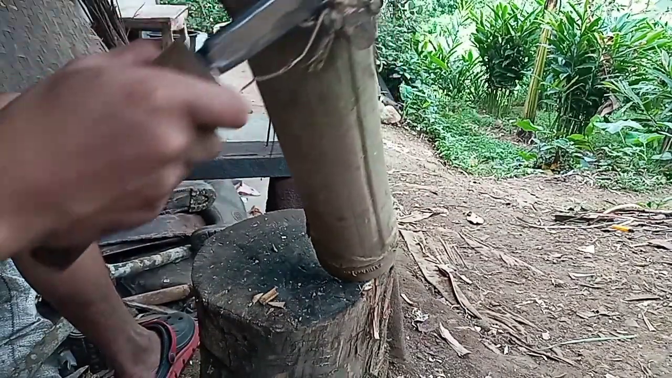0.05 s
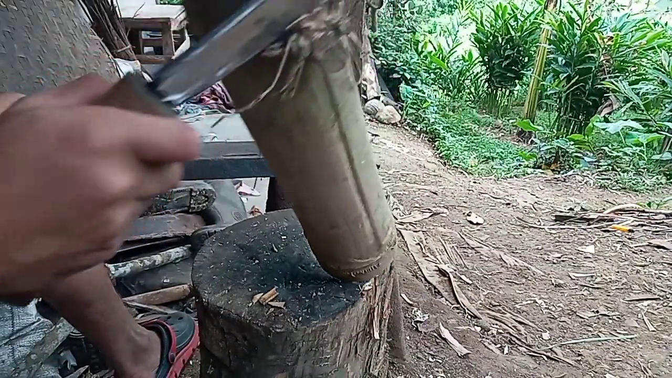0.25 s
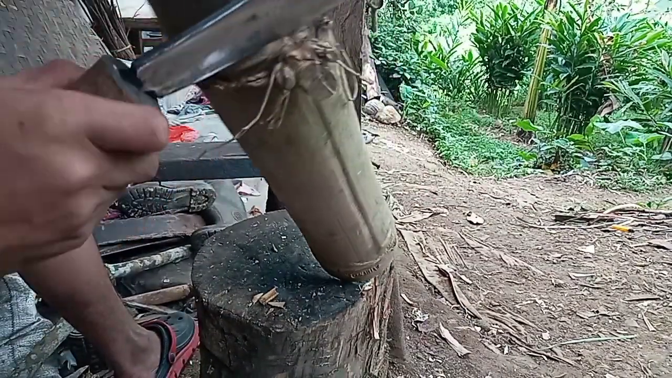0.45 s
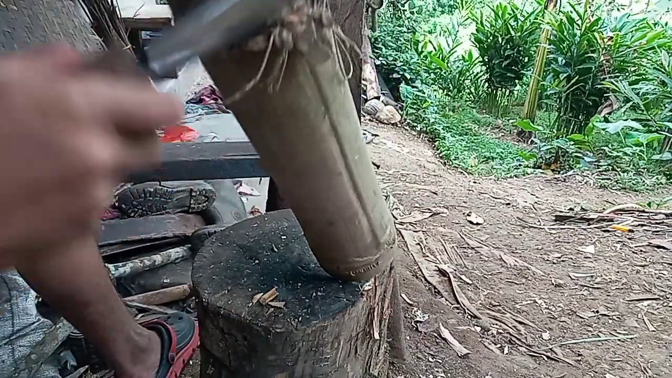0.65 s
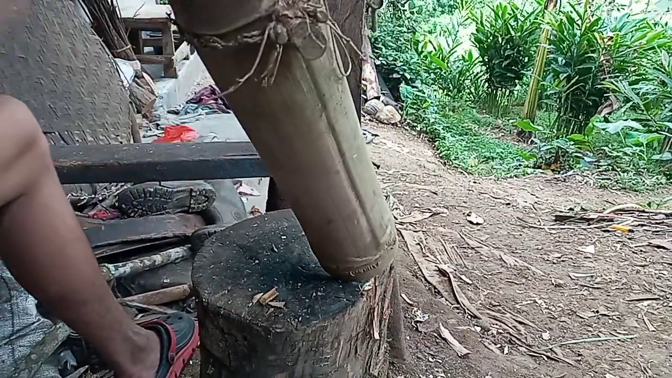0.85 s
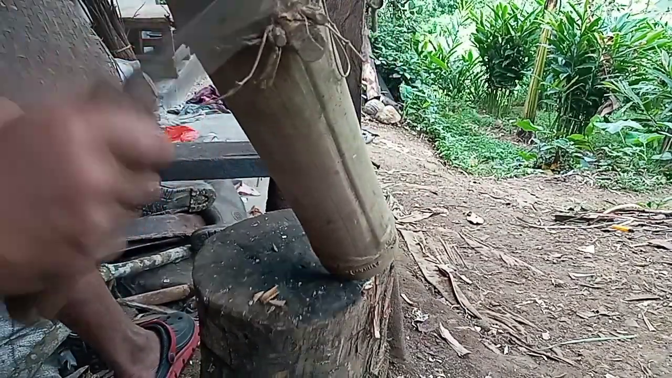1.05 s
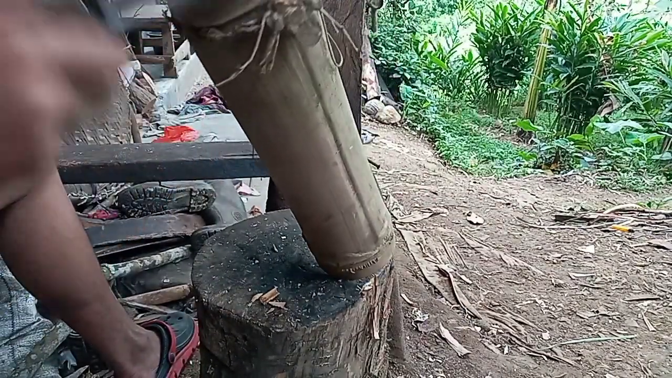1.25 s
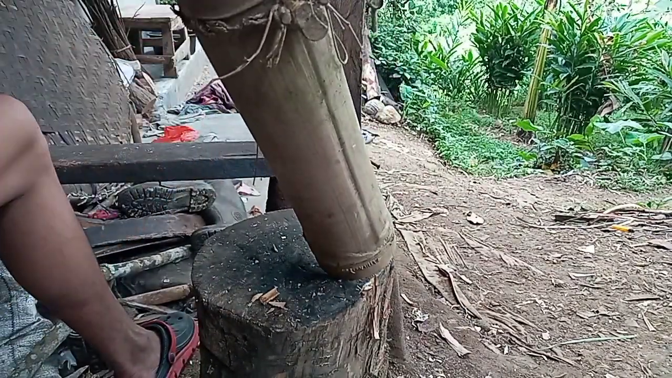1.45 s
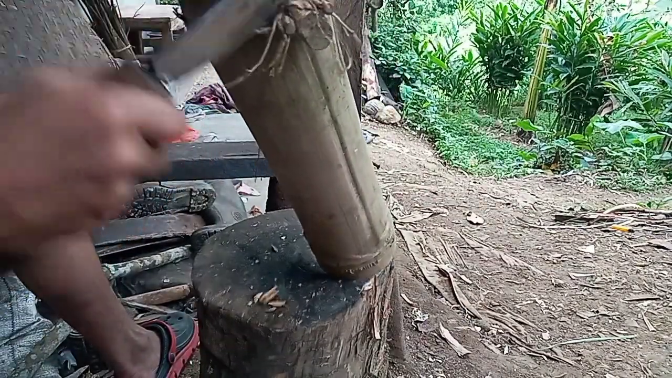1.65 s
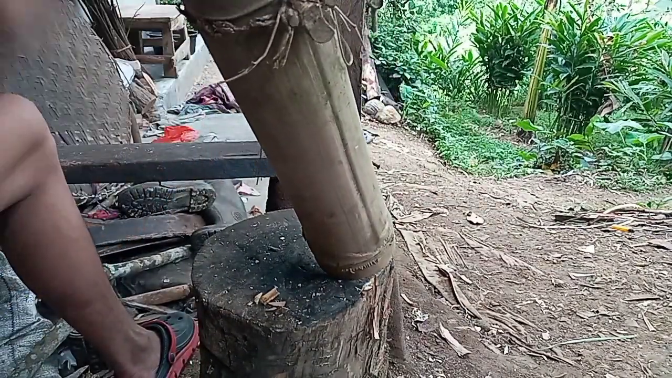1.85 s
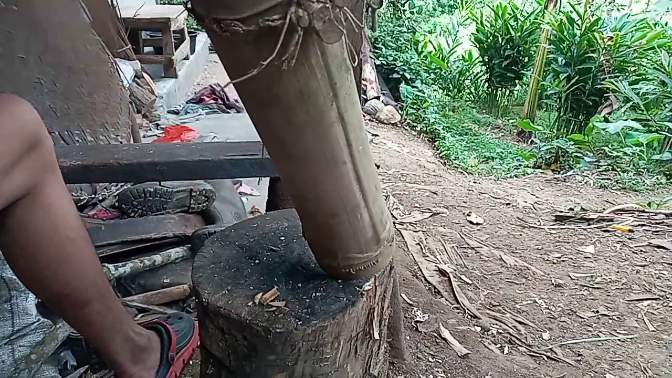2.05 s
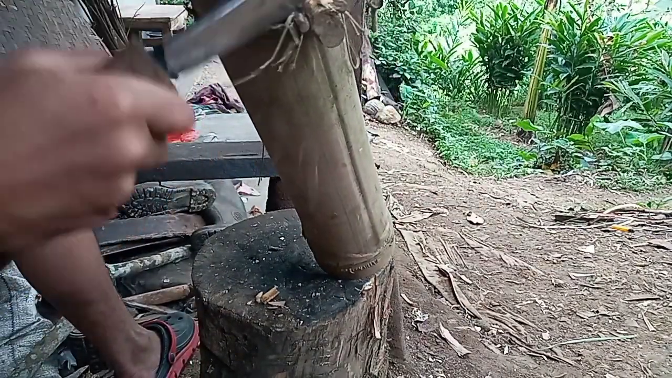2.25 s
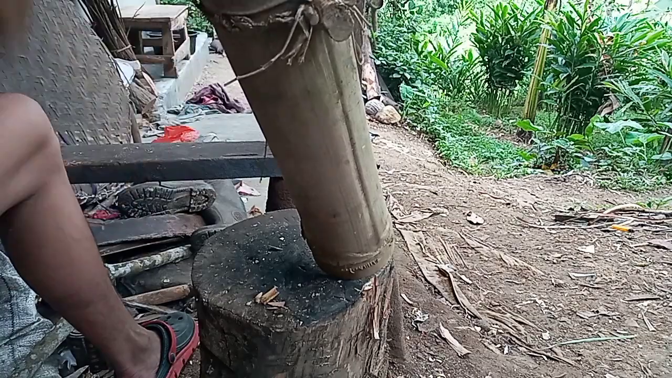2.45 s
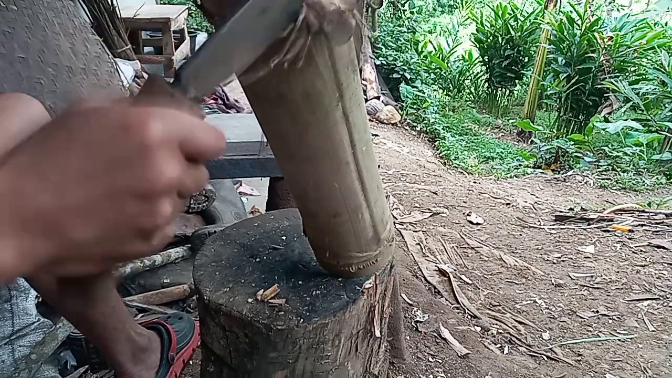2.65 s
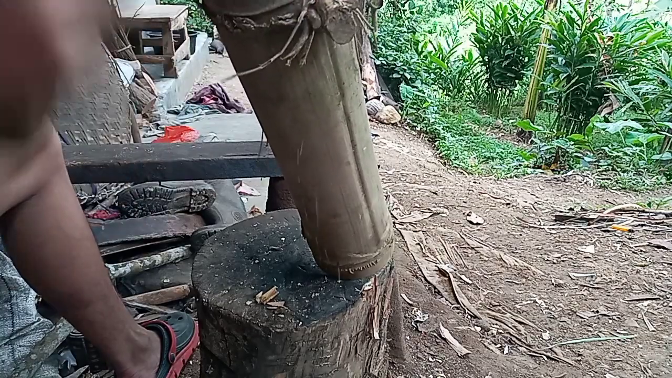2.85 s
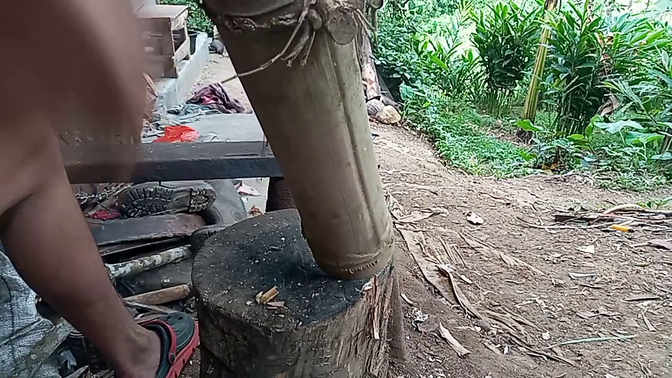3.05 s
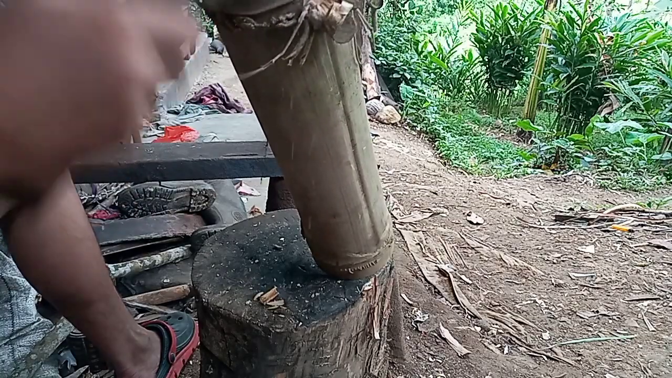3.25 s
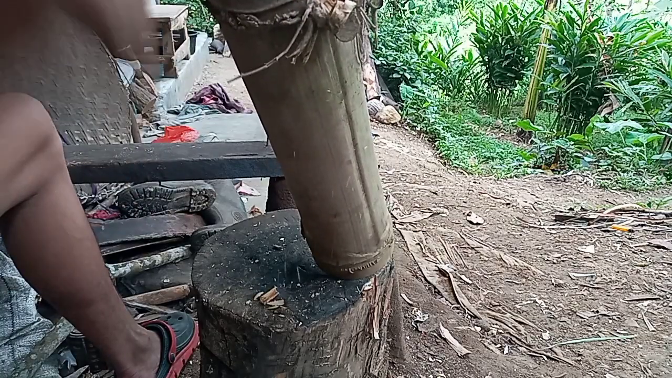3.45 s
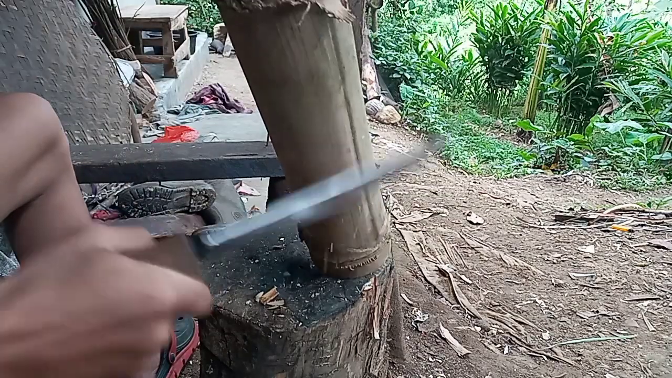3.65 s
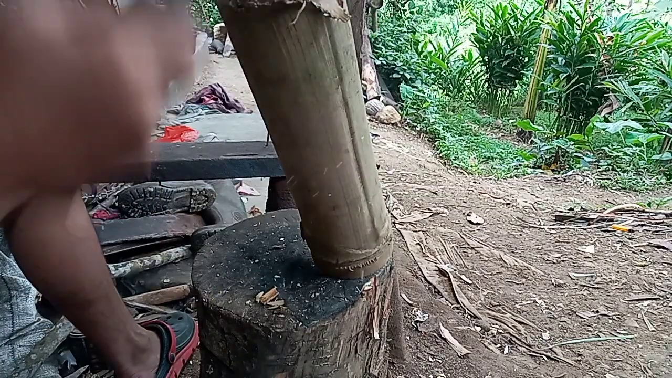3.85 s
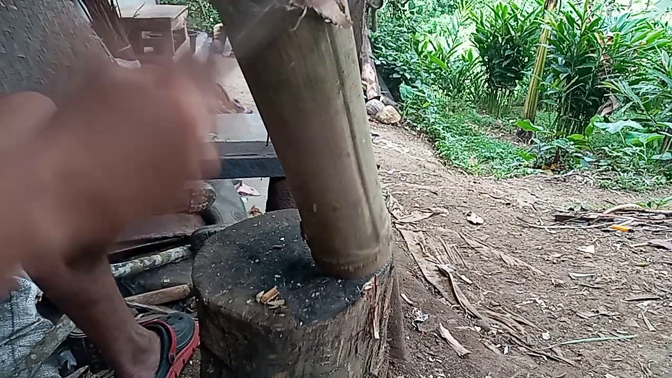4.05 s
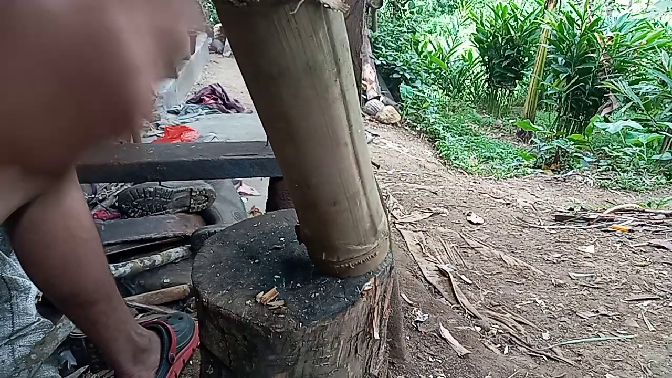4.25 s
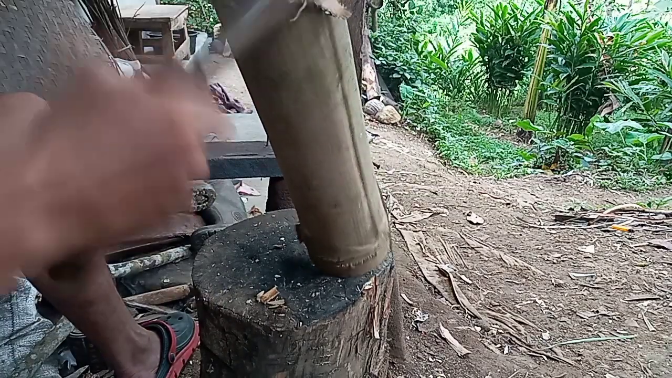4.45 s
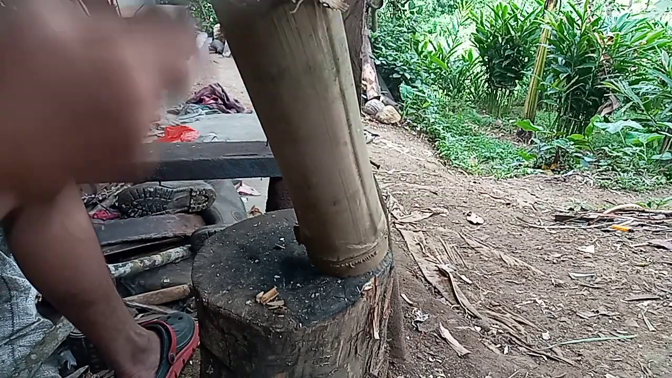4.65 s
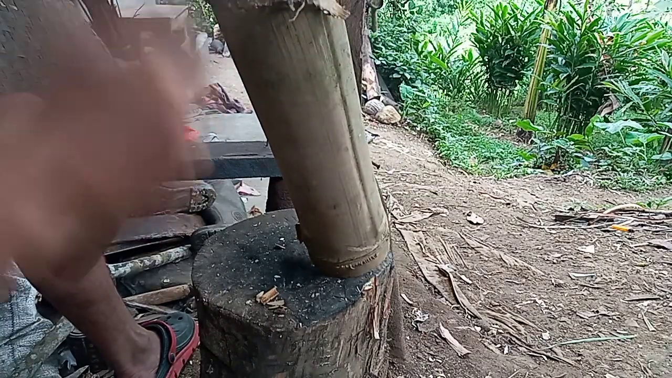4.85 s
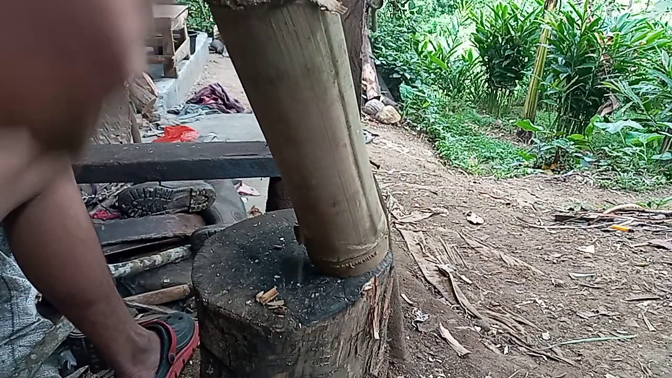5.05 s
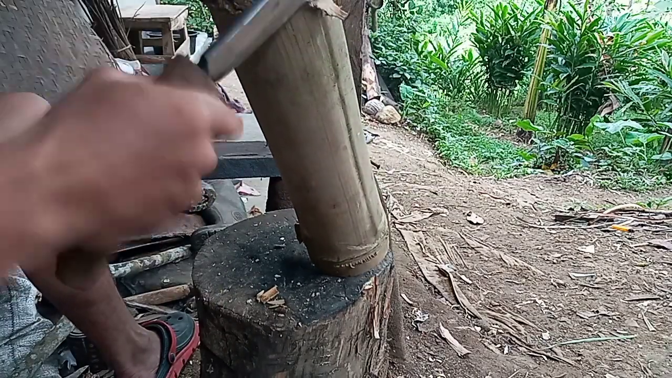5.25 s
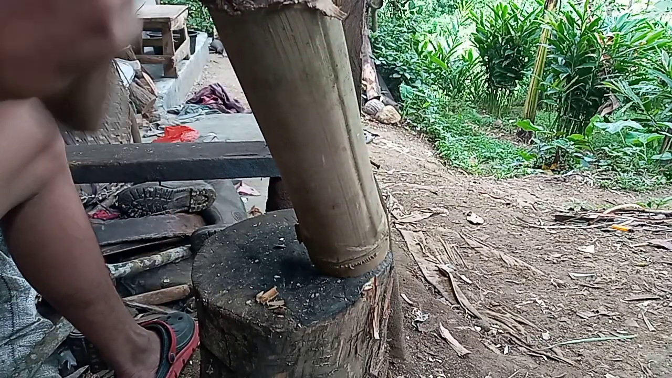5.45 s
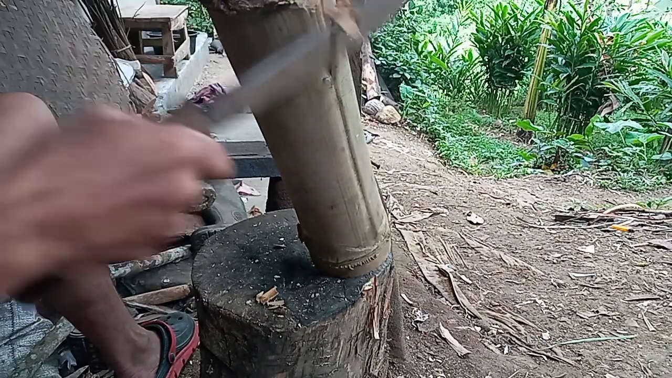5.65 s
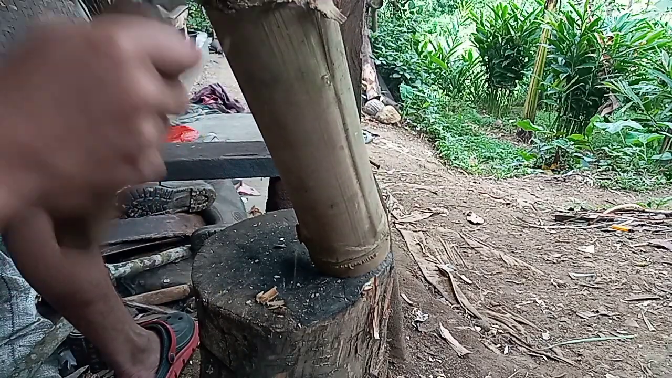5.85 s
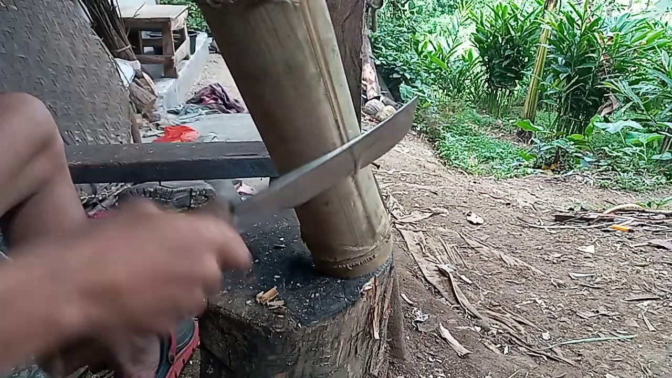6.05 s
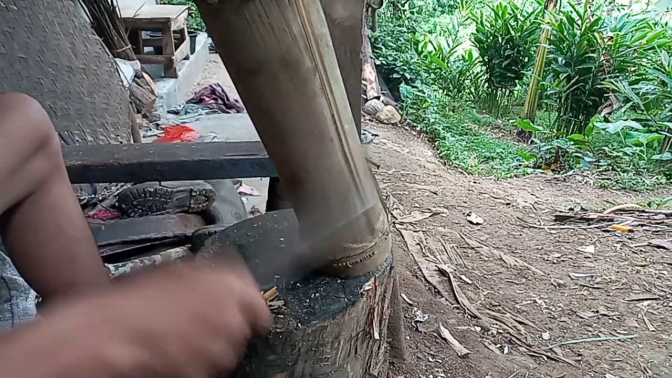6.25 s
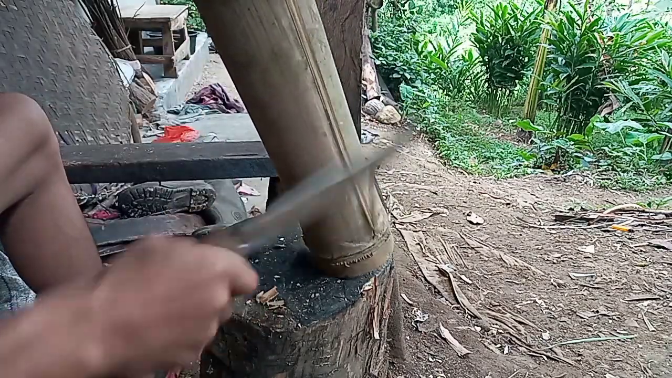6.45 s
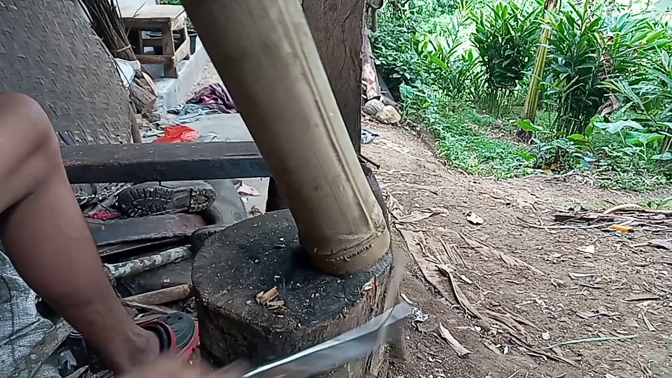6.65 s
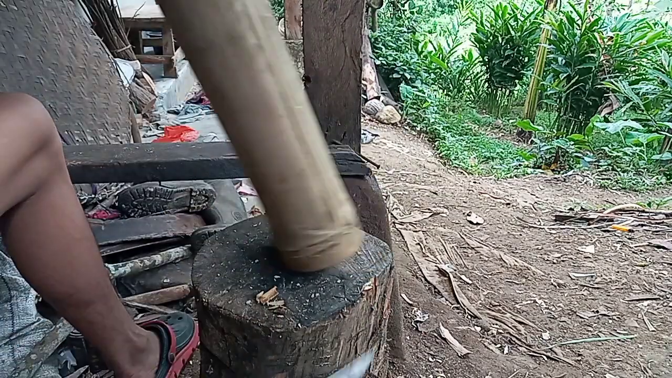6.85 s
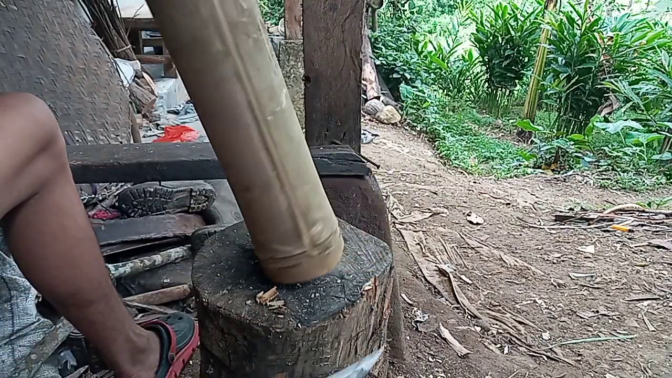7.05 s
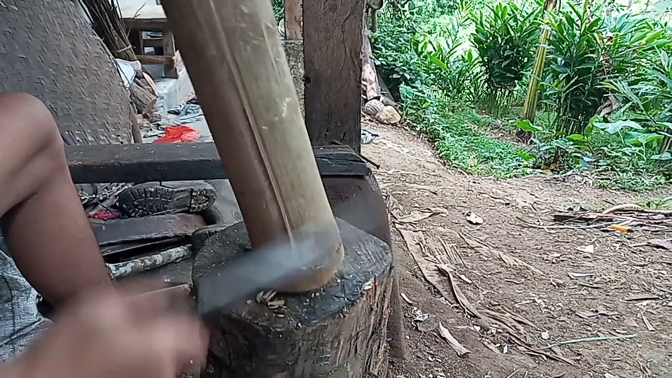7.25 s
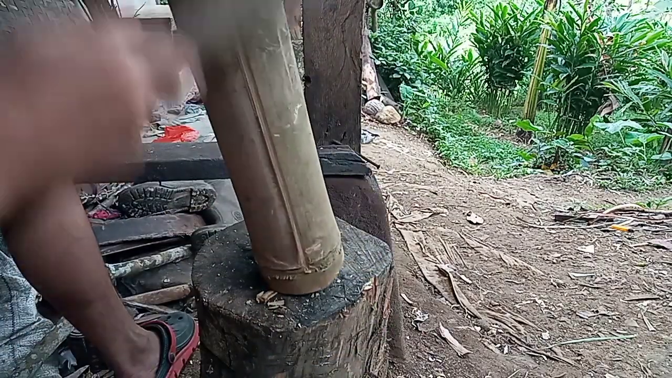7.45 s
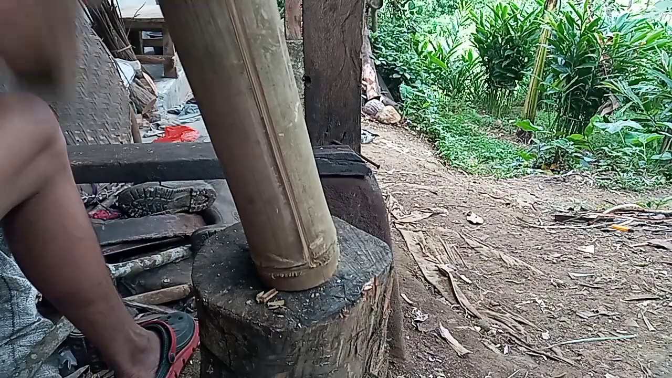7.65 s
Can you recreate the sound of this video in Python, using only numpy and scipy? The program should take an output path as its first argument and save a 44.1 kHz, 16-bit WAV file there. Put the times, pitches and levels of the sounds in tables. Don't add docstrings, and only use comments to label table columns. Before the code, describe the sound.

Faint handling and dry knocks come first, with a low puttering motorbike leaving nearby. Then steady, very loud chops of a blade into hollow bamboo, bright and crackling, slightly quickening, with dry fibre ticks between them and weak echoes from sheds and trees. After the last chop, lighter scraping, snapping and hollow taps fade away, leaving thin insect hiss. The work is very close, nearer the right side of a handheld microphone.

```python
import sys
import numpy as np
from scipy import signal
from scipy.fft import rfft, irfft, next_fast_len
from scipy.io import wavfile
from scipy.ndimage import uniform_filter1d

SR = 44100
rng = np.random.default_rng(int(sys.argv[2]) if len(sys.argv) > 2 else 0)


def unload_audio(sound):
    columns = np.transpose(np.atleast_2d(sound))
    steps = np.round(np.clip(columns, -1, 1) * 32767)
    wavfile.write(sys.argv[1], SR, steps.astype(np.int16))


def decibels_to_gain(level_db):
    exponent = np.asarray(level_db, float) / 20
    return 10 ** exponent


N = 340011

# t/s, blade level/dB, tube, wall and splinters rel. level/dB
BLOWS = [(1.074, -9, -5, -3.5, -0.5), (1.619, -5.5, -7.5, -2, -6.5), (2.138, 0, -11, -5.5, -7),
         (2.644, -3.5, -5.5, -11.5, -8.5), (3.085, -22.5, 10.5, 4.5, -3), (3.103, -5, -6.5, -7, -13.5),
         (3.529, -4, -11.5, -11, -8.5), (4.087, -2.5, -17.5, -11, -9), (4.484, -7.5, -26.5, -7, -8),
         (4.875, 2, -15.5, -11, -15), (5.24, -0.5, -44, -6, -10), (5.589, -0.5, -32, -11, -12.5)]
# t/s, blade level/dB, tube, wall and splinters rel. level/dB
TAPS = [(.211, -63.5, 24.5, 33, 5), (.415, -16.5, -36, -24, -17), (.602, -18.5, -56.5, -23, -49),
        (1.122, -10, -41, -22.5, -24), (3.177, -26, -12, -16, 7.5), (3.813, -5.5, -22.5, -22.5, -18),
        (3.855, -13, -16.5, -16, -8.5), (3.945, -28.5, -52.5, -5, -11.5), (6.361, -11.5, -19, -11.5, -6),
        (6.61, -14.5, -17.5, -14.5, -6), (6.767, -27, -39, -22.5, -1), (6.861, -18.5, -25.5, -14.5, -19)]
# t/s, blade level/dB, tube, wall and splinters rel. level/dB
GLANCES = [
    (5.291, -30, -11, -40, -5.5),
    (5.915, -17.5, -21.5, -3, -9),
    (5.952, -22, -7, -7, -21.5),
    (6.2666, -32, 1, 1.5, -7.5),
    (6.303, -22.5, -49, -40.5, 3.5),
    (6.528, -10, -15, -19.5, -28),
    (6.581, -20.5, -18, -19, 1.5),
    (6.726, -31.5, 1, -11.5, -10.5),
]
# t/s, blade level/dB, splinters rel. level/dB
TICKS = [(1.185, -17.5, -12), (1.38, -25.5, -7), (2.496, -23, 2.5), (2.556, -20.5, -9.5),
         (2.913, -22.5, -23), (2.932, -22, -20), (2.967, -31.5, -7.5), (3.052, -25.5, -1.5),
         (3.389, -18, -14.5), (3.396, -17, -15.5), (3.432, -17.5, -23), (3.437, -26.5, -7.5),
         (4.023, -19.5, -5.5), (5.189, -19.5, -6.5), (5.554, -11, -26.5), (5.687, -16.5, -5),
         (5.703, -24, -1.5), (5.705, -15, -9.5), (5.965, -13.5, -5.5), (5.977, -7, -2.5),
         (6.003, -11.5, -32.5), (6.141, -18, 0), (6.205, -18, -7), (6.677, -15, -15), (6.999, -19.5, -19.5),
         (7.04, -16.5, -52.5), (7.142, -26, 0), (7.342, -30, 4.5),
         (1.565, -31, 0.5), (1.79, -30, -9), (1.862, -35, 0.5), (2.526, -33, -9.5),
               (2.6, -31.5, -7.5), (2.618, -35.5, -1), (4.225, -30, -12.5), (4.405, -33, -15.5),
               (4.745, -28.5, -6.5), (4.789, -27, -8), (5.079, -23.5, -14.5), (5.108, -29, -7),
               (5.145, -29, -7), (5.17, -30.5, -6.5), (5.422, -19.5, -6.5), (6.796, -13, -19.5),
               (6.812, -31, -20), (6.915, -21, -6)]
TICK_TUBE_DB, TICK_WALL_DB = -49, -38
COLOUR_HZ = [800, 2200, 6000, 12000]
BITE_S = .0011
SPOT_LUCK_DB = 1.5
# low, lower middle, ringing, high, rel. level/dB
SPOTS = [(2.5, -3, 0.5, -4.5), (3.5, -5, 1.5, 2), (-10.5, 3, -2.5, -3.8), (-6, -0.5, -2.5, 4.5),
         (-6.5, 5.5, -3, 8), (-12.5, 1.5, -2, 2.5), (2, -1.9, 2.5, -5.5), (-2, 0.5, -1.9, -1),
         (4, -0.5, 0.7, -2), (0, -4, 0.5, -5.5), (3, 3.2, -1, 2), (2.5, -1, -1, -6)]
SPOT_HZ = [800, 1400, 1900, 2750, 4300, 5600, 6900, 9000]
BLADE_RING_DB = [-4.5, -2, -3.5, 1.6, 3, 1, 0.1, -2.5, 1.5, -7.5, -3, -4.3]
EDGES = 220 * 2 ** np.arange(0, 6.4, 1 / 3)
# f/Hz, level per third octave/dB
CRACK = [(250, -27), (450, -5.5), (800, -7.5), (1300, 1), (2000, 2), (3000, -2.5), (4200, 0), (5500, -7),
         (6900, -1.5), (8600, -11), (10500, 2), (13000, -8), (15200, -8.5)]
# f/Hz, T60/s
CRACK_T60 = [(100, 0.069), (600, 0.015), (2000, 0.031), (6000, 0.0083), (15000, 0.0036)]
# f/Hz, level/dB, T60/s
STALK_MODES = [(920, -27, 0.087), (1530, -12, 0.039), (1810, -21, 0.054), (2120, -17.5, 0.013),
               (2500, -11.5, 0.044), (2684, -6.5, .03), (4200, -27, 0.017), (6824, -8.5, 0.02)]

# loudest t/s, swell/s, fade/s, level/dB, share in the tube rel. level/dB
RUBS = [(.022, 0.042, 0.064, -45, -5), (.3, 0.118, 0.22, -41.5, -11), (.61, .07, 0.055, -49.5, -6),
        (.73, 0.033, 0.052, -44.5, -19), (2.56, .11, 0.069, -54.5, -33.5),
        (3.055, 0.013, 0.24, -50.5, -30.5), (3.396, 0.039, 0.24, -59, -28.5), (3.76, 0.17, 0.15, -52.5, -6),
        (3.82, 0.01, 0.13, -41, -28), (4.05, 0.089, 0.044, -53.5, -36), (5.96, 0.029, 0.022, -30, -4),
        (6.01, 0.025, 0.021, -29.5, -43), (6.175, 0.044, 0.063, -37, 4), (6.295, 0.052, 0.035, -30, 3.5),
        (6.805, 0.057, 0.031, -36.5, -42), (6.9, 0.095, 0.081, -33, -11.5),
        (7.035, 0.058, 0.079, -45.5, -33), (7.43, 0.049, 0.058, -53, -3)]
# f/Hz, level per Hz/dB
SCRAPE_COLOUR = [(240, -97), (400, -62), (1150, -37.5), (1450, -2.5), (1830, -4), (2210, -3.5), (4100, 2),
                 (6850, 1), (8600, -3), (10300, -3.5), (12900, -10), (15100, -13.5), (16300, -33)]
# f/Hz, level per Hz/dB
GRIP_COLOUR = [(410, -21.5), (700, -4), (1010, -90.5), (1540, 2.5), (2200, -20.5), (2480, -3.5),
               (4490, -5.5), (5400, -3), (10600, -16), (13800, -11.5), (15100, -26), (16300, -42.5)]
GRIP_ENDS_S = 1
SLIPS_PER_S, SLIP_T60_S, GLIDE_SHARE = 160, .02, .93
SWELL_DB, SWELL_CURVE = 25.5, 2.9

# t/s, lower note level/dB, upper note level/dB
TUBE_PUSHES = [(1.071, -20.5, -20.5), (1.616, -15, -17.5), (2.138, -35, -23), (2.644, -18.5, -9.5),
               (3.086, -14, -31.5), (3.101, -24, -9.5), (3.528, -29, -19.5), (4.083, -23.5, -25.5),
               (4.483, -37.5, -23.5), (4.875, -22, -13), (5.238, -20.5, -11), (5.589, -29.5, -18),
               (5.916, -32, -25), (6.262, -55, -33), (6.586, -49, -30)]
# f/Hz, T60/s
TUBE_NOTES = [(622, .18), (1125, .075)]
AFTER_RING_DB, AFTER_RING_LONGER = -19, 4
# f/Hz, level/dB
LINGERING = [(1820, -56.5), (2110, -55.5), (2760, -52.5)]
LINGER_MIX = [(3.5, 0.5, -14.5), (-2.5, -7.5, -3.5), (-6.5, -4, -2.5), (1, -2, -6), (-6, -5, -3.5),
              (-10.5, -13, -5.5), (0, -2, -11.5), (-1.5, -10, -5.5), (-7.5, -8.5, -2.5), (-0.5, -15.5, -1),
              (-2.5, 0.5, 4.5), (2, 5, 1.5)]
LINGER_T60_S = 0.6
# t/s, lower f/Hz, lower level/dB, upper f/Hz, upper level/dB
WALL_NOTES = [(1.075, 1877, -16.5, 2719, -15.5), (1.623, 1923, -19, 2526, -15),
              (2.141, 1774, -13.5, 2503, -10), (2.646, 1960, -16.5, 2620, -23.5),
              (3.086, 1860, -20, 2800, -24), (3.104, 1866, -16, 2896, -19), (3.529, 1950, -15.5, 2897, -24),
              (4.087, 2250, -19, 2850, -12.5), (4.485, 2313, -17, 2923, -22),
              (4.877, 1788, -11.5, 2835, -13), (5.24, 1861, -15.5, 2700, -12.5),
              (5.59, 2200, -17, 2950, -14), (5.9155, 1942, -11, 2885, -15.5),
              (5.954, 2162, -23, 2664, -20.5)]
WALL_T60_S, WALL_SOFT_S = 0.092, 0.0019
# t/s, peak level/dB, f/Hz, T60/s
KNOCKS = [(0.2099, -26, 1583, 0.098), (0.6015, -33.5, 1846, 0.032), (5.915, -16, 2087, 0.11),
          (5.9549, -21.5, 1086, 0.064), (6.1794, -35, 1290, 0.036), (3.777, -31, 2580, 0.03),
          (3.777, -31.5, 1520, .03), (6.2682, -16, 1852, 0.069), (6.27, -19, 1508, 0.1),
          (6.53, -15.5, 1477, 0.18), (6.5281, -20, 2120, 0.116), (6.5809, -23, 1130, 0.14),
          (6.7274, -20.5, 1540, 0.098), (6.8633, -24, 1180, 0.035), (7.45, -49, 1130, 0.11)]
# t/s, peak level/dB, f/Hz, T60/s
PINGS = [(.015, -44, 1122, .09), (.04, -45, 1140, 0.1), (.03, -35, 3030, .07), (.05, -51, 1840, .07),
         (.316, -36, 3000, 0.069), (.605, -44, 2720, .08), (.7, -41.5, 2717, .06), (.705, -47, 1834, 0.08),
         (5.9162, -9.5, 2700, 0.011), (5.948, -27, 1110, 0.084), (5.9552, -15, 2390, 0.014),
         (6.269, -11.5, 1730, .012), (6.5282, -14, 3900, 0.011), (6.729, -23, 3650, .015)]
# t/s, peak level/dB, f/Hz
SNAPS = [(0.414, -31.5, 7360), (1.1164, -20.5, 6900), (1.1228, -18, 6680), (1.1304, -25, 6970),
         (1.2037, -20, 6820), (1.2114, -30.5, 6990), (3.7155, -29, 3680), (3.7963, -24.5, 6920),
         (3.8127, -17.5, 6430), (3.8222, -7.5, 6480), (3.8304, -26.5, 7040), (3.8487, -18.5, 7480),
         (3.8694, -22.5, 7000), (3.8854, -27, 7040), (3.8944, -28.5, 7840), (3.9064, -31, 6900),
         (3.9194, -30, 6550), (6.0038, -12, 7150), (6.0084, -8, 6590), (6.0124, -14.5, 6640),
         (6.0184, -16, 6580), (6.2974, -18.5, 6740), (6.3041, -21, 8480), (6.3041, -9, 7170),
         (6.7755, -29.5, 6500), (6.795, -26, 6240), (6.9154, -20.5, 6800)]
SNAP_T60_S, SNAP_DB, SNAP_CLICK_DB = 0.01, -1, -3
# t/s, peak level/dB, f/Hz
THUDS = [(0.208, -27, 312), (0.211, -36, 432), (0.366, -32, 554), (0.608, -36, 100), (1.07, -21, 231.7),
         (1.618, -28, 111.2), (2.134, -28, 110.8), (2.641, -43.5, 227), (3.097, -17.5, 229),
         (3.522, -41, 213.5), (4.084, -25.5, 209.5), (4.482, -35.5, 102.3), (4.875, -18.5, 112.4),
         (5.239, -17.5, 236), (5.587, -38, 208.5), (6.269, -34.5, 231.5), (6.523, -28, 228.7),
         (6.581, -32, 239.7)]

# delay t/s, level/dB
ECHOES = [(.008, -32), (0.018, -47.5), (0.039, -53.5), (0.101, -57), (0.161, -65.5), (.2, -71.5),
          (0.3, -92), (0.502, -95.5)]
# f/Hz, level/dB
ECHO_COLOUR = [(100, 12.5), (700, -9), (1500, -5.5), (2600, -2), (5500, 4), (6900, -1), (9000, -2),
               (12500, -1)]
NEAR_DB, NEAR_T60_S = -31, .03
# loudest t/s, level/dB
BOOMS = [(1.759, -48.5), (2.301, -53.5), (2.679, -63), (3.24, -44), (4.2, -47), (4.62, -48.5), (5.04, -49),
         (5.38, -45), (5.71, -59), (6.3, -53)]
BOOM_SWELL_S, BOOM_FADE_S, BOOM_HZ = 0.074, 0.033, (175, 230.3)

# t/s, level/dB, open-throttle bark rel. level/dB
BIKE = [(0.0, -44.5, -5.5), (.17, -40.5, -4), (.41, -62.5, 18), (.62, -42.5, -7), (1.0, -42.5, -6),
        (1.44, -49, -12), (2.12, -53, 0), (2.64, -51.5, -7), (3.1, -65, 6), (3.28, -54.5, -16.5),
        (3.69, -57, -8), (3.82, -81, 1), (4.27, -56.5, -6), (4.62, -53, -26.5), (5.5, -64, -13),
        (5.73, -94, 11.5), (6.4, -68, -8), (7.71, -82, -4)]
# t/s, firing rate f/Hz
FIRING = [(0.0, 27.1), (0.45, 28.6), (1.01, 32.5), (1.41, 33.5), (1.46, 30.3), (1.6, 29.5), (1.7, 27),
          (1.85, 24.8), (1.98, 26.7), (2.67, 27.2), (3.04, 29.4), (3.32, 33.0), (3.48, 33.5), (3.9, 29.0),
          (4.2, 28.4), (4.65, 28.9), (4.9, 27.6), (5.6, 27.8)]
# f/Hz, level/dB
EXHAUST_LOW = [(30, -75.5), (60, -7.5), (80, 14.5), (110, 9.5), (135, 0), (165, -49.5), (300, -120)]
# f/Hz, level/dB
EXHAUST_UPPER = [(60, -99), (120, -12), (148, -1.5), (180, 5.5), (245, -5), (290, -27.5), (500, -120)]
# t/s, level/dB
RATTLE = [(0.0, -64), (.25, -49), (.62, -49), (.8, -58.5), (1.42, -55.5), (1.52, -81.5), (7.71, -101.5)]
# f/Hz, level/dB, T60/s
PIPE = [(432, -2, 0.056), (526, 3, 0.043), (604, -3, 0.28)]
CORNER_S, CORNER_TAKES_S = 1.4, .12
ROUGH_NEAR, ROUGH_HIDDEN, ROUGH_PER_S = .16, .4, .32
LUMP_DB = 3
LANE_ECHO, LANE_LAG_S, LANE_LAG_PER_S = .35, .012, .003

# f/Hz, width/Hz, level over the chorus/dB
INSECTS = [(7340, 220, -8.5), (9985, 1250, 4), (15150, 900, -21.5)]
# loudest t/s, swell/s, fade/s, low one level/dB, high one rel. level/dB
CRICKETS = [(1.98, 0.37, 0.14, -65.5, 3.5), (2.39, 0.089, 0.25, -75.5, 13.5), (4.4, 0.17, 0.2, -80.5, 19.5),
            (4.75, 0.22, 0.15, -78, 14), (7.6, 0.27, 0.3, -57.5, -4)]
CHIRPS_PER_S, CHIRP_DEPTH_DB = 36, 10
# f/Hz, level per Hz/dB
AIR = [(30, -4), (100, -11), (300, -15), (1000, -19), (2500, -18), (5500, -15.5), (7500, -16), (8300, -45),
       (11500, -24.5), (13500, -48.5), (15000, -30.5)]
AIR_DB = -1.5
CHORUS_DB, DUCK_DB, RECOVER_S = -56, -6.5, 0.3
AIR_DUCK = 1.6

# f/Hz, left over right level/dB
LEFT_PORT = [(60, 8), (200, 0.5), (500, 6), (1000, 3), (2200, 8), (5000, 4), (7500, 14), (9000, -2),
             (11000, -10), (13000, -4), (15500, -1)]
# f/Hz, level/dB
MIC_TOP = [(11500, -1), (13300, -11.5), (15000, 15), (16200, -1.5)]
BLOW_LAG_S, BIKE_LAG_S = 45 / 44100, 31 / 44100
MIC_CUT_HZ, TOP_HZ = 61, 15700


def rms_one(x):
    return x / np.sqrt(np.mean(x ** 2) + 1e-20)


def in_time(rows, outside=None):
    s, *columns = np.transpose(rows)
    return [np.interp(np.arange(N) / SR, s, c, outside, outside) for c in columns]


def at_hz(points, hz):
    table_hz, value = np.transpose(points)
    return np.interp(np.log(hz), np.log(table_hz), value)


def band(x, low_hz, high_hz, order=2):
    return signal.sosfilt(signal.butter(order, [low_hz, high_hz], "band", fs=SR, output="sos"), x)


def tint(x, points):
    size = next_fast_len(N + 4096)
    hz = np.maximum(np.arange(size // 2 + 1) * SR / size, 1)
    return irfft(rfft(x, size) * decibels_to_gain(at_hz(points, hz)), size)[..., :N]


def drift(rate):
    r = np.exp(-80 * np.pi * rate / SR)
    slow = signal.lfilter([1], [1, -2 * r, r * r], rng.standard_normal(N // 40 + 2002))[2000:]
    return np.interp(np.arange(N) / 40, np.arange(len(slow)), rms_one(slow))


def ring(drive, hz, t60):
    r, w = decibels_to_gain(-60 / (t60 * SR)), 2 * np.pi * hz / SR
    return signal.lfilter([0, np.sin(w)], [1, -2 * r * np.cos(w), r * r], drive + 1e-18)


def struck(rows, soft_s, rough):
    out, t = np.zeros(N + SR), np.arange(SR // 4) / SR
    for s, level_db, hz, t60 in rows:
        wobble = rough * np.cumsum(rng.standard_normal(len(t))) if rough else 0
        fading = decibels_to_gain(level_db - 60 * t / min(t60, .09)) * (1 - np.exp(-t / soft_s))
        out[int((s - BLOW_LAG_S) * SR):][:len(t)] += np.sin(2 * np.pi * hz * t + wobble) * fading
    return out[:N]


def swells(rows):
    t, out = np.arange(N) / SR, np.zeros((2, N))
    for s, swell_s, fade_s, level_db, rel_db in rows:
        near = slice(max(int((s - 2 * swell_s) * SR), 0), int((s + 2 * fade_s) * SR))
        away = np.abs(t[near] - s) / np.where(t[near] < s, swell_s, fade_s)
        out[:, near] += decibels_to_gain(level_db - SWELL_DB * away ** SWELL_CURVE + np.array([[0], [rel_db]]))
    return out


def grit(per_s, spread_db):
    sizes = decibels_to_gain(spread_db * np.minimum(rng.exponential(1, N), 4)) * rng.choice([-1, 1], N)
    return rms_one(sizes * (rng.random(N) < per_s / SR))


def burst(rows, hz, t60, rise_s, extra_db=0):
    rows = np.array(rows)
    colour_db = [np.interp(np.log(hz), np.log(COLOUR_HZ), [tube, wall, 0, splinter])
                 for tube, wall, splinter in rows[:, 2:]]
    kicks = np.full(N, 1e-18)
    kicks[((rows[:, 0] - BLOW_LAG_S) * SR).astype(int)] = decibels_to_gain(rows[:, 1] + colour_db + extra_db)
    fall, rise = decibels_to_gain(-60 / (t60 * SR)), np.exp(-1 / (rise_s * SR))
    return signal.lfilter([2 - fall - rise], np.convolve([1, -fall], [1, -rise]), kicks)


def spot_db(hz):
    return np.array([np.interp(np.log(hz), np.log(SPOT_HZ), [0, *row, 0, blade_db, 0])
                     for row, blade_db in zip(SPOTS, BLADE_RING_DB)])


def stalk():
    out = swish()
    tearing, scraping = [grit(12000, 3.0), grit(12000, 4.5)], grit(9000, 3.7)
    broad, tube = rubbing()
    ticks = [(s, db, TICK_TUBE_DB, TICK_WALL_DB, splinter_db) for s, db, splinter_db in TICKS]
    taps = TAPS + ticks
    for k, (low, high) in enumerate(zip(EDGES, EDGES[1:])):
        hz = np.sqrt(low * high)
        t60 = at_hz(CRACK_T60, hz)
        luck_db = spot_db(hz) + rng.normal(0, SPOT_LUCK_DB, len(BLOWS))
        shape = burst(BLOWS, hz, t60, BITE_S, luck_db)
        shape += burst(taps, hz, 0.76 * t60, 0.00015, extra_db=-7.0)
        shape += burst(GLANCES, hz, t60, 0.0015, extra_db=1.5)
        to_unit_band = np.sqrt(SR / 2 / (high - low))
        out += band(tearing[k % 2] * shape, low, high) * decibels_to_gain(at_hz(CRACK, hz)) * to_unit_band
    gripped = np.arange(N) < GRIP_ENDS_S * SR
    by_hand, by_edge = rms_one(tint(scraping, GRIP_COLOUR)), rms_one(tint(scraping, SCRAPE_COLOUR))
    out += np.where(gripped, by_hand, by_edge) * broad
    for hz, level_db, t60 in STALK_MODES:
        luck_db = spot_db(hz) + rng.normal(0, 1.5, len(BLOWS))
        shape = burst(BLOWS, hz, 0.035, BITE_S, luck_db)
        shape += burst(taps, hz, 0.038, 0.0019, extra_db=-19.0)
        shape += burst(GLANCES, hz, 0.0078, 0.00028, extra_db=6.5)
        force = shape * tearing[0] + decibels_to_gain(-22) * broad * scraping
        out += decibels_to_gain(level_db - 12) * ring(force, hz, min(t60, 70 / hz))
    return out + tube_notes(tube * scraping) + lingering(tearing[1], gripped * broad * scraping)


def swish():
    rows, kicks = np.array(BLOWS), np.full(N, 1e-18)
    kicks[((rows[:, 0] - BLOW_LAG_S) * SR).astype(int)] = decibels_to_gain(rows[:, 1] - 36.5)
    growing = signal.lfilter([1], [1, -np.exp(-1 / (0.0048 * SR))], kicks[::-1])[::-1]
    hiss = rms_one(band(rng.standard_normal(N), 6600, 7050))
    parting = rms_one(band(rng.standard_normal(N), 900, 9000))
    return growing * (hiss + decibels_to_gain(-9.0) * parting)


def tube_notes(rubbing_force):
    rows, out = np.array(TUBE_PUSHES), np.zeros(N)
    for k, (hz, t60) in enumerate(TUBE_NOTES):
        push = k * decibels_to_gain(-33.0) * rubbing_force
        push[((rows[:, 0] + .001 + .003 * k) * SR).astype(int)] += decibels_to_gain(rows[:, 1 + k] + 2.5 + 0.38 * k)
        after_ring = k * decibels_to_gain(AFTER_RING_DB) * ring(push, hz, AFTER_RING_LONGER * t60)
        out += band(ring(push, hz, t60) + after_ring, hz / 1.6, hz * 1.6)
    return out


def lingering(grain, gripping):
    out = np.zeros(N)
    for (hz, level_db), mix_db in zip(LINGERING, np.transpose(LINGER_MIX)):
        luck_db = mix_db + rng.normal(0, 1.2, len(BLOWS))
        shape = burst(BLOWS, hz, LINGER_T60_S, BITE_S, luck_db + spot_db(hz))
        out += decibels_to_gain(level_db) * ring(grain * shape, hz, 0.1)
    for hz, level_db in ((1550, -25), (2150, -25.5), (4500, -23)):
        out += decibels_to_gain(level_db) * ring(gripping, hz, 0.045)
    return out


def wall_notes():
    rows = [(s, db, hz, WALL_T60_S) for s, *notes in WALL_NOTES for hz, db in (notes[:2], notes[2:])]
    return struck(rows, WALL_SOFT_S, rough=0)


def snaps():
    clicks = np.zeros(N)
    for s, level_db, _ in SNAPS:
        clicks[int((s - BLOW_LAG_S) * SR) + 8] = decibels_to_gain(level_db + SNAP_CLICK_DB)
    rings = struck([(s, db + SNAP_DB, hz, SNAP_T60_S) for s, db, hz in SNAPS], .0004, rough=0)
    return rings + struck(PINGS, 0.00065, rough=0) + band(clicks, 1800, 12000)


def knocks():
    return band(struck(KNOCKS, .001, rough=.12), 600, 4000)


def thuds():
    return struck([(*row, .07) for row in THUDS], .003, rough=.03)


def rubbing():
    slip_fall = decibels_to_gain(-60 / (SLIP_T60_S * SR))
    slips = rms_one(signal.lfilter([1], [1, -slip_fall], np.abs(grit(SLIPS_PER_S, 1.8))))
    return swells(RUBS) * decibels_to_gain(1.6 * drift(36)) * (GLIDE_SHARE + (1 - GLIDE_SHARE) * 5.1 * slips)


def echoes(x):
    s, level_db = np.transpose(ECHOES)
    t = np.arange(SR // 2) / SR
    near = rng.standard_normal((2, SR // 20)) * decibels_to_gain(NEAR_DB - 60 * t[:SR // 20] / NEAR_T60_S)
    far = rng.standard_normal((2, len(t))) * decibels_to_gain(np.interp(t, s, level_db, -120))
    far = signal.fftconvolve(tint(x, ECHO_COLOUR)[None], far, axes=1)[:, :N]
    far = np.real(signal.hilbert(far, next_fast_len(N))[:, :N] * np.exp(2.2j * drift(40)))
    return far + signal.fftconvolve(band(x, 980, 13000)[None], near, axes=1)[:, :N]


def boom():
    gain = swells([(s, BOOM_SWELL_S, BOOM_FADE_S, db, 0) for s, db in BOOMS])[0]
    return gain * rms_one(band(rng.standard_normal(N), *BOOM_HZ))


def motorbike():
    t = np.arange(N) / SR
    low_db, bark_db = in_time(BIKE)
    upper_db = low_db + bark_db
    since = np.maximum(t - CORNER_S, 0)
    hidden = np.minimum(since / CORNER_TAKES_S, 1)
    rough = ROUGH_NEAR + ROUGH_HIDDEN * hidden + ROUGH_PER_S * since
    turns = np.cumsum(in_time(FIRING)[0]) / SR + .52
    fired = np.diff(np.floor(turns), prepend=0) > 0
    puffs = rms_one(fired * decibels_to_gain(1.5 * drift(12))) + rough * rng.standard_normal(N)
    puffs += LANE_ECHO * np.interp(t - LANE_LAG_S - LANE_LAG_PER_S * t, t, puffs)
    puffs /= np.sqrt(1 + rough ** 2)
    gas = rng.standard_normal(N) * (.6 + np.exp(-3 * (turns % 1)))
    rattle = band(gas + puffs, 300, 720, order=4)
    pipe = sum(decibels_to_gain(db) * ring(rattle, hz, t60) for hz, db, t60 in PIPE)
    rattle = 0.5 * rms_one(rattle) + rms_one(pipe)
    low_db = low_db + LUMP_DB * hidden * drift(25.0)
    upper_db = upper_db + LUMP_DB * hidden * drift(9.9)
    rumble = (0.27 + 0.68 * hidden) * rms_one(tint(puffs, EXHAUST_LOW))
    hum = (1 - hidden) * np.sin(8 * np.pi * turns) * decibels_to_gain(2 * drift(11.0) - 3.0)
    low = decibels_to_gain(low_db + 5.5) * (rumble + hum)
    upper = decibels_to_gain(upper_db + 9.0) * rms_one(tint(puffs, EXHAUST_UPPER))
    return low + upper + decibels_to_gain(in_time(RATTLE)[0]) * rms_one(rattle)


def ducking():
    cuts = np.zeros(N) - 1.5
    for s, *_ in BLOWS + GLANCES:
        cuts[int(s * SR):] = np.maximum(cuts[int(s * SR):], s)
    return decibels_to_gain(uniform_filter1d(DUCK_DB * np.exp((cuts - np.arange(N) / SR) / RECOVER_S), size=2000))


def insects():
    def song(hz, width_hz):
        return rms_one(band(rng.standard_normal((2, N)), hz - width_hz / 2, hz + width_hz / 2, order=4))
    chorus = np.zeros((2, N))
    for hz, width_hz, level_db in INSECTS:
        waver = 2.0 + 1.3 * (hz < 8000)
        chorus += song(hz, width_hz) * decibels_to_gain(level_db + waver * drift(5))
    air = decibels_to_gain(AIR_DB) * rms_one(tint(rng.standard_normal((2, N)), AIR))
    low, high = swells(CRICKETS)
    duck = ducking()
    pulses = decibels_to_gain(CHIRP_DEPTH_DB * (np.tanh(2 * drift(CHIRPS_PER_S / 2)) - 1.0))
    crickets = (song(2950, 200) * low + song(4800, 250) * high) * pulses
    return (chorus + air * duck ** (AIR_DUCK - 1)) * decibels_to_gain(CHORUS_DB) * duck + crickets


def ports(x, lag_s):
    smear = .075 * np.diff(rng.standard_normal(91)) * np.exp(-np.arange(90) / 25)
    smear[0] = 1
    late = signal.lfilter(smear / np.sqrt(np.sum(smear ** 2)), [1], np.roll(x, round(lag_s * SR)))
    return np.array([late, decibels_to_gain(-1.5) * x])


def scene():
    stump = thuds()
    work = decibels_to_gain(-1) * stalk() + knocks() + stump + wall_notes() + snaps()
    bike = motorbike() + boom()
    bike_at_ports = np.array([np.roll(bike, round(BIKE_LAG_S * SR)), bike])
    left, right = ports(work, BLOW_LAG_S) + echoes(work) + bike_at_ports + insects()
    half = np.array(LEFT_PORT) * [1, .5]
    return np.array([tint(left, half), tint(right, half * [1, -1])])


def band_limit(x):
    return signal.sosfilt(signal.butter(12, 15900, fs=SR, output="sos"), x)


def record(dry):
    squeezed = np.tanh(tint(dry, MIC_TOP) / 0.86)
    bass_cut = signal.butter(3, MIC_CUT_HZ, "high", fs=SR, output="sos")
    top_cut = signal.butter(8, TOP_HZ, fs=SR, output="sos")
    mix = np.clip(signal.sosfilt(np.vstack([bass_cut, top_cut]), squeezed), -1, 1)
    return band_limit(mix)


dry = scene()
out = record(dry)
unload_audio(out)
```